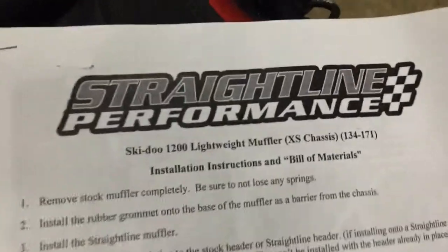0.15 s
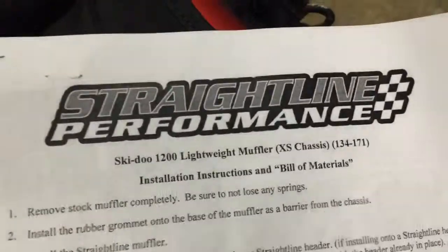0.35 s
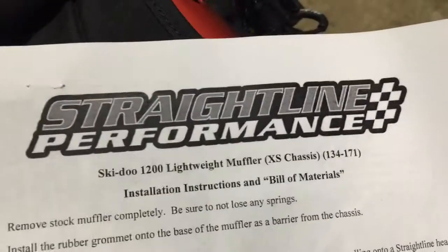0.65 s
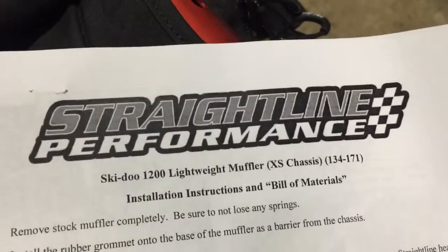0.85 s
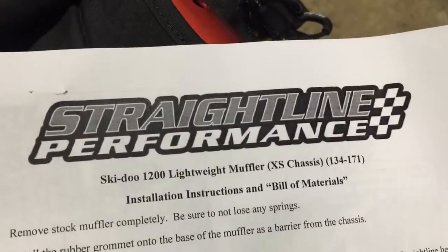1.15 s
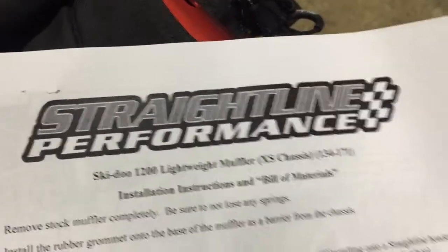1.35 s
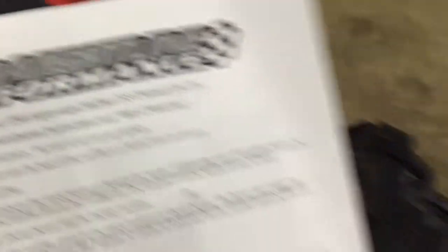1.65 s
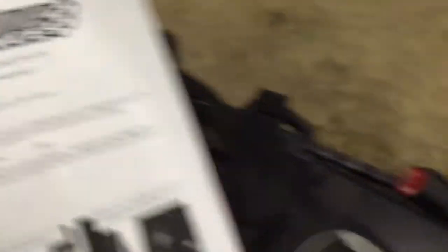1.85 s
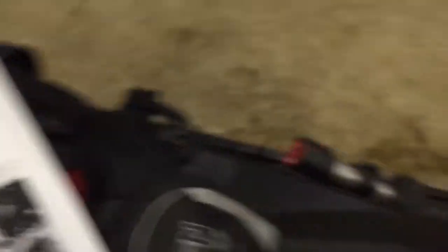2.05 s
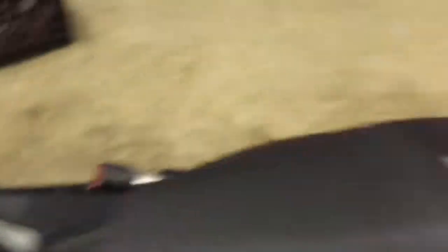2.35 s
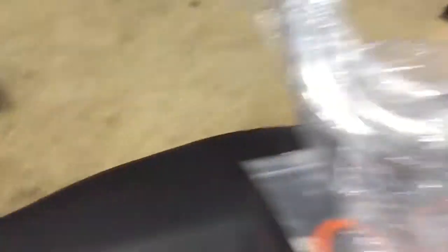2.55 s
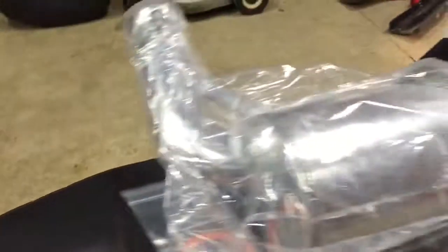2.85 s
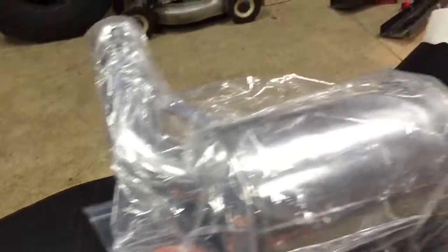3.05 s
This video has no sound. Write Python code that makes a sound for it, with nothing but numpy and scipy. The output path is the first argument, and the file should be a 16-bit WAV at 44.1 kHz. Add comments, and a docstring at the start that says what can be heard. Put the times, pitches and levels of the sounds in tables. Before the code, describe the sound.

A snowmobile engine idles in a garage, with a low muffler drone, light valve ticking and scattered booming stumbles. Near the end the microphone swings toward the engine and the clatter grows louder and fuller.

```python
"""A three-cylinder four-stroke snowmobile engine idles in a garage, about forty firings a second.
From the start the muffler drones on low multiples of the firing rate, valve gear ticks, the casing
rings and uneven firings rumble in pipe and room. From 0.3 s on, scattered stumbles boom.
After 2 s the microphone swings toward the engine; the clatter grows louder and fuller in the low end.
The strongest stumble comes near 2.9 s."""
import sys
import numpy as np
from scipy import signal
from scipy.fft import rfft, irfft
from scipy.io import wavfile
from scipy.ndimage import uniform_filter1d

SR = 44100
rng = np.random.default_rng(int(sys.argv[2]) if len(sys.argv) > 2 else 0)


def wav_record(signal):
    """Record a signal, one row per channel, as 16-bit PCM in the file named by sys.argv[1]."""
    frames = np.transpose(np.atleast_2d(signal))
    bounded = np.clip(frames, -1, 1)
    # unit amplitude maps onto the largest positive 16-bit level
    quanta = np.round(bounded * 32767).astype(np.int16)
    wavfile.write(sys.argv[1], SR, quanta)


N = 141120


def undb(db):
    """Decibels to gain."""
    return 10 ** (np.asarray(db) / 20)


def level(x, db):
    """Scale to an rms level."""
    return x * undb(db) / np.sqrt(np.mean(x ** 2))


def curve(table, column=1):
    """One column of a time table at every sample."""
    rows = np.array(table, float)
    return np.interp(np.arange(N) / SR, rows[:, 0], rows[:, column])


def drift(rate_hz):
    """Smooth random motion with a spread near 1."""
    hold = int(SR / rate_hz)
    steps = np.repeat(rng.standard_normal(N // hold + 1), hold)
    return 1.07 * uniform_filter1d(uniform_filter1d(steps, hold), hold)[:N]


def resonate(x, hz, width_hz):
    """A resonance applied twice, for steep skirts."""
    b, a = signal.iirpeak(hz, hz / width_hz, fs=SR)
    return signal.lfilter(b, a, signal.lfilter(b, a, x))


def colour(x, spectrum):
    """Filter by (Hz, dB) points, rolling off below the first."""
    hz, db = np.array(spectrum, float).T
    bins_hz = np.maximum(np.fft.rfftfreq(N, 1 / SR), 1)
    gain = undb(np.interp(np.log(bins_hz), np.log(hz), db))
    low_cut = np.minimum(bins_hz / hz[0], 1) ** 2
    return irfft(rfft(x) * gain * low_cut, N)


def burst(decay_s):
    """Decaying noise of unit energy."""
    envelope = np.exp(-np.arange(N) / SR / decay_s)
    return level(rng.standard_normal(N) * envelope, 0) / np.sqrt(N)


def pulses(cycles, place, sizes, jitter_s=0.0002):
    """One slightly mistimed pulse per cycle, at the given place in it."""
    at = np.interp(np.arange(len(sizes)) + place, cycles, np.arange(N), right=2 * N)
    at = (at + jitter_s * SR * rng.standard_normal(len(sizes))).astype(int)
    heard = (at >= 0) & (at < N)
    return np.bincount(at[heard], sizes[heard], N)


# Low exhaust harmonics. Each row: time in seconds, levels of the 2nd, 3rd and 4th in dB before trim.
LOW_HARMONICS = [(0.06, -20, -31, -27), (0.08, -22, -31, -35), (0.19, -23, -46, -27), (0.28, -24, -24, -27),
                 (0.31, -22, -29, -24), (0.66, -21, -28, -21), (0.74, -19, -26, -33), (0.9, -20, -32, -23),
                 (1.04, -23, -31, -32), (1.26, -20, -28, -21), (1.55, -22, -29, -30), (1.66, -22, -47, -30),
                 (1.72, -22, -29, -26), (1.83, -22, -36, -34), (1.88, -23, -24, -24), (1.96, -21, -30, -33),
                 (2.59, -18, -23, -27), (2.78, -17, -29, -36), (2.85, -18, -29, -28), (2.9, -25, -25, -34),
                 (3.0, -19, -31, -24), (3.17, -18, -25, -25)]
# 5th harmonic, on a sharp resonance, with sudden dips. Each row: time in seconds, dB before trim.
FIFTH_HARMONIC = [(0.03, -18), (0.26, -16), (0.34, -31.5), (0.36, -21), (0.6, -23.5), (0.62, -31.5),
                  (0.72, -22.5), (1.12, -17.5), (1.18, -30), (1.27, -16), (1.34, -27.5), (1.48, -18),
                  (1.87, -17), (1.92, -28.5), (2.04, -19), (2.36, -21), (2.41, -26.5), (3.03, -26),
                  (3.07, -35), (3.17, -24)]
# Weaker exhaust harmonics. Each row: multiple of the firing rate, mean level in dB.
WEAK_HARMONICS = [(1, -34), (6, -49), (7, -43.5), (8, -47), (9, -57.5), (11, -57), (12, -48.5), (14, -54.5),
                  (17, -53.5)]
def muffler_drone(firings, low_trim_db=-0.05, fifth_trim_db=0.04):
    """Harmonics of the firing rate leave the muffler, each slipping a little in phase."""
    def harmonic(k):
        lag_rad = 0.0888 * k ** 2  # the pipe delays high harmonics more
        slip_rad = 0.72 * min(k / 4, 2) * drift(rate_hz=14)
        return np.sqrt(2) * np.cos(2 * np.pi * k * firings - lag_rad + slip_rad)

    out = sum(undb(curve(LOW_HARMONICS, k - 1) + low_trim_db) * harmonic(k) for k in (2, 3, 4))
    out += undb(curve(FIFTH_HARMONIC) + fifth_trim_db) * harmonic(5)
    for k, db in WEAK_HARMONICS:
        waver_db = 4 * min(k / 6, 1) * drift(rate_hz=25)
        out += undb(db + waver_db) * harmonic(k)
    return out


# Pipe and garage resonances. Each row: frequency in Hz, width in Hz, relative level in dB.
PIPE_MODES = [(66.3, 20, 4.5), (115.7, 41, -2), (158.7, 26, -3), (198.2, 72, -4), (250, 36, -9),
              (344, 19, -12.5)]
def pipe_rumble(firings, facing, facing_rise_db=3.5):
    """Scatter in firing strength excites pipe and garage, louder toward the engine."""
    out = 0
    for hz, width_hz, db in PIPE_MODES:
        puffs = pulses(firings, 0, rng.uniform(-1, 1, size=160))
        out += level(resonate(puffs, hz, width_hz), db)
    return level(out, -28.5) * undb(facing_rise_db * facing)


# Engine stumbles. Each row: start in seconds, base level in dB, base swell time in seconds.
STUMBLE_EVENTS = [(0.321, -18.5, 0.058), (0.496, -21, .04), (.79, -21.5, 0.06), (1.132, -22, 0.026),
                  (1.549, -36, 0.02), (1.893, -17, 0.054), (2.498, -31, 0.048), (2.741, -17.5, 0.062),
                  (2.851, -12, 0.078)]
# Modes a stumble rings. Each row: frequency in Hz, share of the swell time, level offset in dB.
BOOM_MODES = [(63.7, 0.98, 1.5), (107.8, 0.52, -11), (135, 0.89, -17), (180, 0.39, -7.5)]
def stumble_booms():
    """Each stumble sets off a low boom in pipe and room that swells and dies."""
    out = np.zeros(N)
    for start_s, db, swell_s in STUMBLE_EVENTS:
        age_s = np.maximum(np.arange(N) / SR - start_s, 0)
        for hz, share, mode_db in BOOM_MODES:
            stage = age_s / (swell_s * share)
            envelope = (stage * np.exp(1 - stage)) ** 2
            out += undb(db + mode_db) * envelope * np.sin(2 * np.pi * hz * age_s)
    return out


# Ticks in one cycle of three firings. Each row: place in the cycle from 0 to 1, relative level in dB.
TICK_PATTERN = [(.07, -3.5), (.2, 0), (.38, -6), (.55, -2), (.71, 1.5), (.79, -9), (.9, -4)]
def valve_ticks(firings, scatter_db=3.5, room_db=5.5, room_t60_s=0.32):
    """Valves and pistons tick, each with its own short ring and room tail."""
    out = 0
    for place, db in TICK_PATTERN:
        ring = burst(decay_s=0.0053) + undb(room_db) * burst(room_t60_s / np.log(1000))
        sizes = undb(db + scatter_db * rng.standard_normal(size=60))
        hits = pulses(firings / 3, place, sizes)
        out += irfft(rfft(hits) * rfft(ring), N)
    return out


# Clatter spectrum beside the machine. Each row: frequency in Hz, relative gain in dB.
BESIDE_SPECTRUM = [(150, -25.5), (300, 1), (385, 1), (460, 3.5), (550, -1), (620, -1), (760, -2),
                   (1120, -5), (1400, -2), (2150, -7.5), (2800, -6.5), (3300, -10), (4100, -9.5),
                   (4850, -18), (5600, -12.5), (6400, -19), (7500, -21), (9500, -28.5), (10300, -33.5),
                   (12800, -36), (15000, -36.5)]
# Clatter spectrum facing the engine. Each row: frequency in Hz, relative gain in dB.
FACING_SPECTRUM = [(150, 9), (290, 1), (390, 1.5), (490, 0.5), (620, -1), (750, -1), (1100, -3),
                   (1400, 0.5), (1750, -6.5), (2050, -5.5), (2300, -9.5), (2900, -5), (3400, -10),
                   (4000, -8.5), (4850, -16.5), (5700, -14.5), (7500, -22), (9500, -27), (10400, -30.5),
                   (15000, -34)]
def clatter(firings, facing, wash_depth=0.12):
    """Ticks and the wash of chain and clutch reflect off floor and bodywork; tone follows the swing."""
    ticks = valve_ticks(firings)
    wash = rng.standard_normal(N) * np.exp(wash_depth * np.sin(2 * np.pi * firings))
    direct = level(ticks, -4.5) + level(wash, -2.5)
    reflected = undb(-12) * irfft(rfft(direct) * rfft(burst(decay_s=0.042)), N)
    side = level(colour(direct + reflected, BESIDE_SPECTRUM), -38)
    front = level(colour(direct + reflected, FACING_SPECTRUM), -31)
    return (1 - facing) * side + facing * front


# Casing modes. Each row: frequency in Hz, width in Hz, base level in dB,
# place in the firing from 0 to 1, throb depth in nepers.
CASING_MODES = [(953, 116, -45, 0.23, 0.27), (1430, 140, -63, .6, 0.36), (1862, 40, -59.5, 0.7, 0.32),
                (2435, 60, -57.5, .7, .5), (3480, 38, -60, 0.5, 0.22), (3574, 55, -61, 0.1, 0.72),
                (3786, 42, -54, 0.3, 1), (4000, 220, -60, 0.5, 0.96), (3970, 620, -52, 0.39, 0.73)]
# Swell of all casing modes. Each row: time in seconds, gain in dB.
CASING_GAIN = [(0, 2), (.95, 1), (1.18, 2), (1.35, 2), (1.7, 0.5), (2.0, 2.5), (2.23, 5), (2.4, -1),
               (2.67, 5.5), (2.88, -3), (3.2, 6)]
def casing_rings(firings, cylinder_depth=0.04):
    """Narrow metallic rings throb with each firing, one cylinder harder than the others."""
    imbalance = -cylinder_depth * np.sin(2 * np.pi * firings / 3)
    out = 0
    for hz, width_hz, db, place, depth in CASING_MODES:
        throb = np.exp(depth * np.cos(2 * np.pi * (firings - place)) + imbalance)
        out += level(resonate(throb * rng.standard_normal(N), hz, width_hz), db)
    return out * undb(curve(CASING_GAIN))


# Engine speed. Each row: time in seconds, firings per second.
FIRING_RATE = [(0.0, 39.5), (0.17, 39.5), (0.29, 40.7), (0.77, 41.1), (1.09, 39.5), (1.16, 40.5),
               (1.34, 40.5), (1.4, 40.2), (1.52, 40.1), (1.6, 39.5), (1.91, 40.2), (1.97, 39.5),
               (2.04, 39.9), (2.28, 39.8), (2.37, 40.2), (2.58, 40.2), (2.75, 40.0), (3.01, 41.1),
               (3.14, 40.8), (3.2, 40.1)]
# Microphone swing. Each row: time in seconds, share facing the engine from 0 to 1.
MIC_SWING = [(0, 0), (1.95, 0), (2.15, 0.13), (2.35, 0.34), (2.55, 0.69), (2.95, 1), (3.2, 0.77)]
def scene():
    """Mono mix; all but the stumbles follow the running count of firings."""
    firings = np.cumsum(curve(FIRING_RATE)) / SR
    facing = curve(MIC_SWING)
    exhaust = muffler_drone(firings) + pipe_rumble(firings, facing) + stumble_booms()
    return (exhaust + clatter(firings, facing) + casing_rings(firings))[None]


def record(dry):
    """A short fade-in avoids a click; a steep low-pass cuts the top."""
    fade_s, cutoff_hz = 0.004, 15700
    fade = np.minimum(np.arange(N) / SR / fade_s, 1)
    low_pass = signal.ellip(10, 0.2, 80, cutoff_hz, fs=SR, output="sos")
    return signal.sosfilt(low_pass, dry * fade)


dry = scene()
out = record(dry)
wav_record(out)
```